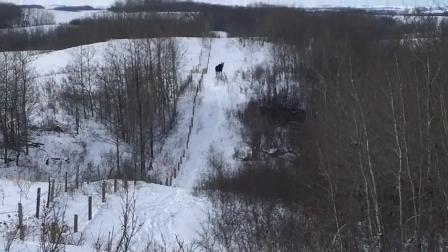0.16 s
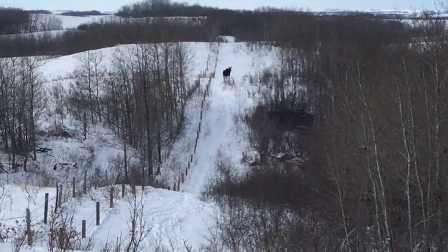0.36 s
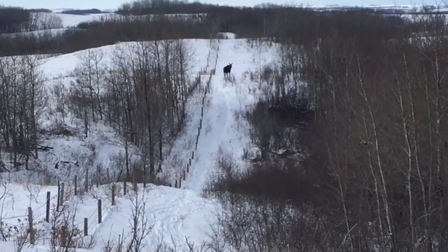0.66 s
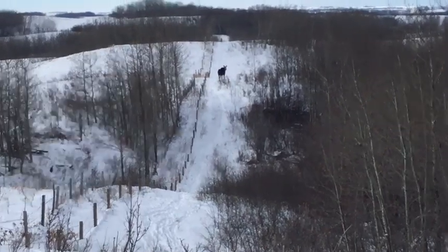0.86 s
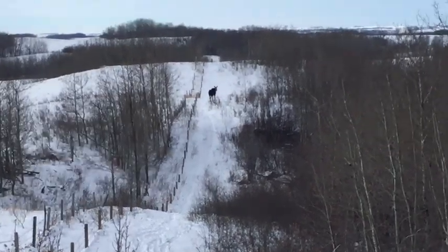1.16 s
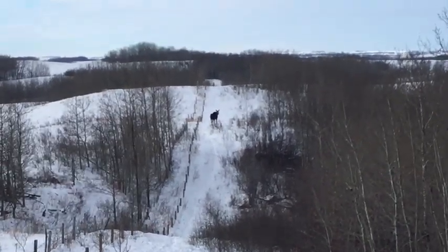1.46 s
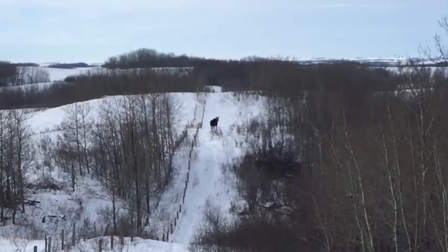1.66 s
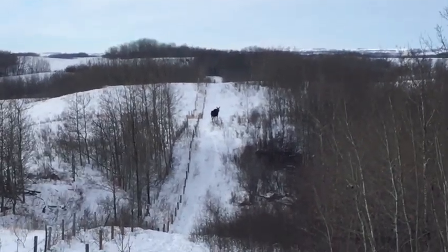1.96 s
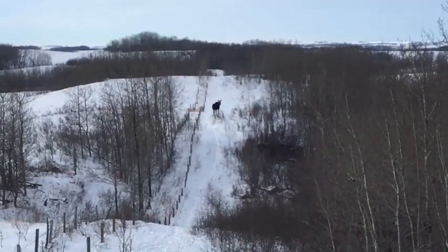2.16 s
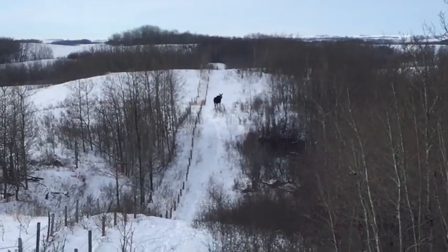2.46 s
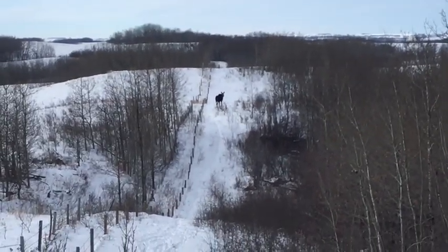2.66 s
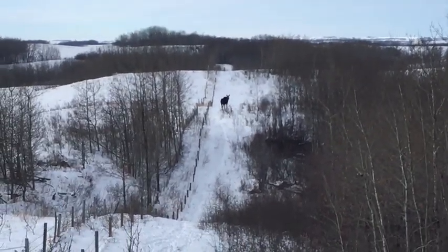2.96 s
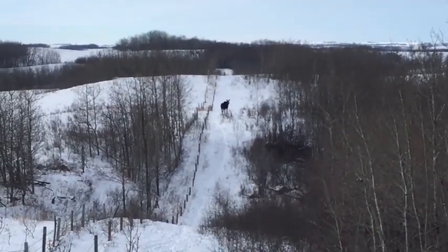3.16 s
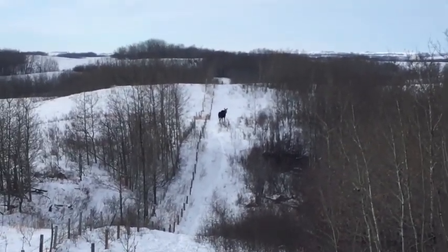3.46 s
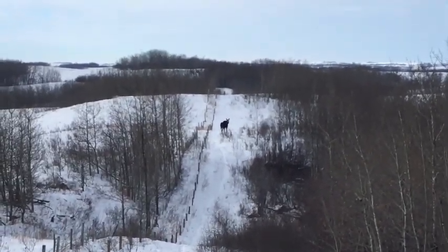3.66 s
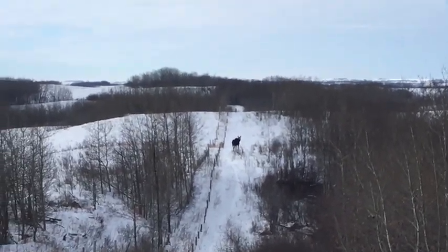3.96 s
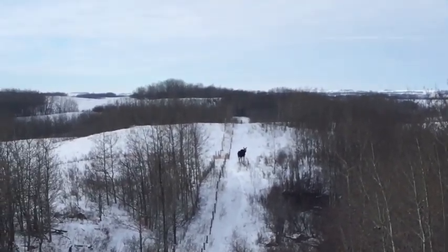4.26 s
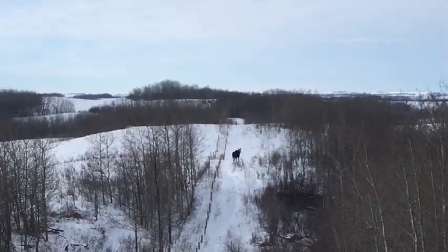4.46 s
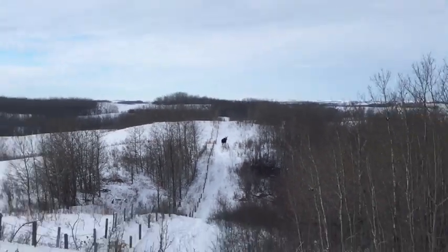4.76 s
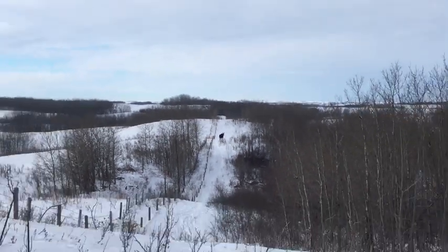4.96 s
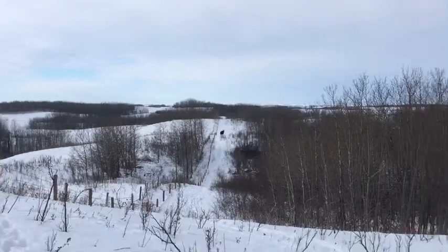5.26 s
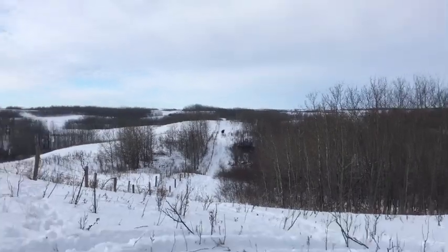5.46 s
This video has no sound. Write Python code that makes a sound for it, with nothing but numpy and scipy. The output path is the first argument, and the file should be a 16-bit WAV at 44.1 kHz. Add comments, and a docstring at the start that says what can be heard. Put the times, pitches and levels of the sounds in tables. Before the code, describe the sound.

Steady pulsing idle of a nearby snowmobile engine outdoors, with small stumbles, thumps and clacking loose steel parts.

```python
"""A two-stroke snowmobile idles close by on open snow, no echo; the crank turns about 28 times a second.
From the start: crank drone, fan whir, gas hiss, block and cowling clatter, loose clutch parts rattling.
Only every other turn burns well, so the exhaust pipe throbs at half the crank rate.
From 0.1 s on, odd burns knock and thump, steel clacks, and stumbles swap hard and missed turns.
A thin opening squeal is gone by 1.3 s; the rattle has grown by then, and the idle runs on to the end."""
import sys
import numpy as np
from scipy import signal
from scipy.fft import rfft, irfft
from scipy.io import wavfile
from scipy.ndimage import uniform_filter1d

SR = 44100
rng = np.random.default_rng(int(sys.argv[2]) if len(sys.argv) > 2 else 0)


def int16_out(signal):
    """Quantize to a 16-bit WAV file."""
    q = np.round(np.clip(np.atleast_2d(signal).T, -1, 1) * 32767)
    wavfile.write(sys.argv[1], SR, q.astype(np.int16))


N = 247389
TIME_S = np.arange(N) / SR

# Table levels are relative.
# crank speed (time [s], speed [turns/s])
CRANK_HZ = [(0.0, 28.35), (0.4, 28.39), (0.9, 28.54), (1.3, 28.28), (1.7, 27.97), (2.2, 28.11),
            (2.7, 28.35), (3.2, 28.4), (3.7, 28.09), (4.2, 28.18), (4.7, 28.28), (5.2, 28.2), (5.6, 28.49)]
# turns that half fire instead of missing (time [s], burn [-1 missed to +1 hard])
STUMBLES = [(0.11, 0.04), (0.98, 0.067), (1.23, 0.19), (1.62, 0.21), (2.79, 0.11), (3.54, 0.29),
            (3.78, -0.012), (4.25, 0.34), (4.35, 0.16), (4.74, 0.22), (4.85, 0.28), (4.95, 0.27),
            (5.56, 0.31)]
# drone partials (order [x crank speed], level [dB])
DRONE_ORDERS = [(2, -3.5), (3, 3.5), (4, -22), (5, -4.5), (7, -13.5), (8, -24.5), (9, -18.5), (11, -18),
                (12, -24.5), (15, -30), (16, -23.5), (17, -35), (18, -35), (19, -30.5), (23, -35),
                (26, -32)]
# fan and belt whir (frequency [Hz], level [dB])
WHIR_COLOUR = [(300, 1.5), (450, 0), (800, -0.5), (1100, -2.5), (1350, -2), (1550, 3), (1750, -4),
               (2350, -4.5), (2800, -16), (4000, -20)]
# gas hiss at the port (frequency [Hz], level [dB])
GAS_COLOUR = [(1500, -10), (3800, -33), (4800, -8.5), (6000, 5), (7800, -6.5), (9400, 0), (10400, -10.5),
              (11800, -5), (13500, -1.5), (15600, -11.5)]
# rattle and hiss during an even lope (time [s], level [dB])
RATTLE_DB = [(0, -55), (.85, -54), (1.3, -49.5), (1.8, -49), (2.6, -50.5), (4.5, -48.5), (5.6, -52)]
# cowling panel resonances (frequency [Hz], width [Hz], level [dB])
PANEL_MODES = [(311.8, 27, -1), (448.8, 18.6, -1), (535, 88, -13.5), (620, 36, -9), (725.3, 16.6, 0.5),
               (877.1, 15.9, 1.5), (895.6, 16.8, 1), (998, 40, 1), (1068, 33, 2), (1135, 37, 0.5),
               (1182, 38, 1.5)]
# loose steel parts (frequency [Hz], level [dB])
STEEL_COLOUR = [(1500, -24.5), (2700, 8.5), (3800, 2), (4350, -2), (4800, -3), (5250, 8), (6800, -2.5),
                (7700, 0.5), (9400, -3.5), (10400, -24), (13500, -14), (15600, -5.5)]
# steel resonances, seated loose (frequency [Hz], width [Hz], level [dB])
LOOSE_MODES = [(2930, 21, 19), (4440, 26, 16.5), (6020, 26, 17.5), (6870, 120, 12)]
# steel resonances, seated snug (frequency [Hz], width [Hz], level [dB])
SNUG_MODES = [(4240, 99, 14), (5246, 110, 17), (5540, 41, 8.2), (6130, 41, 6.5), (7250, 65, 9.2),
              (8100, 52, 5.1)]
# seating of the steel parts (time [s], seating [0 loose to 1 snug])
SEATING = [(0, 0.4), (1.1, 0.48), (1.35, 0.039), (2.1, 0.03), (2.4, 0.42), (3.4, 0.34), (5.6, 0.61)]
# sharpest steel clacks (time [s], ring level [dB], gas level [dB])
CLACKS = [(0.13, -43, -66), (0.316, -54, -54), (0.531, -52, -53), (0.662, -63, -55), (0.680, -64, -53),
          (0.879, -51, -50), (1.058, -49, -50), (1.126, -49, -50), (1.202, -58, -54), (1.233, -46.5, -59),
          (1.374, -52, -56), (1.447, -45, -46.5), (1.518, -42.5, -49), (1.734, -45, -60), (1.767, -44, -49),
          (1.837, -44, -44.5), (1.876, -43.5, -61), (1.912, -50, -50), (1.984, -58, -56), (2.195, -50, -46),
          (2.235, -45.5, -54), (2.266, -45, -50), (2.408, -47.5, -49.5), (2.478, -46, -52),
          (2.619, -47, -43.5), (2.658, -43, -60), (2.937, -41, -45), (3.018, -51, -55), (3.077, -48, -53),
          (3.219, -53, -47), (3.289, -47, -49), (3.430, -53, -51), (3.536, -51, -52), (3.861, -57, -48),
          (3.93, -42.5, -44.5), (3.999, -49, -54), (4.071, -45, -56), (4.141, -44, -46), (4.495, -45, -49),
          (4.566, -48, -48), (4.637, -44, -51), (5.031, -46, -49), (5.097, -40.5, -44), (5.176, -47, -57),
          (5.240, -52, -52), (5.380, -50, -49), (5.563, -51, -48)]
# engine block (frequency [Hz], level [dB])
BLOCK_COLOUR = [(120, -16.5), (250, 6.5), (320, 3.5), (400, 1.5), (460, 3.5), (620, 1), (720, 4.5),
                (800, -4.5), (880, 7.5), (1000, 1.5), (1180, 1), (1320, -5), (1570, -6), (1720, -15),
                (2350, -10.5), (2800, -29.5), (4000, -29), (9000, -35)]
# piston and drive slaps on the block (crank angle [turns], level [dB], gain per unit burn [dB])
SLAPS = [(.04, -5, 12), (.16, -4.5, 14), (.26, -8.5, -9), (.355, -4, 14), (.53, -4, 13), (.70, -5, 14),
         (.85, -4, 3)]
# pipe and silencer resonances (frequency [Hz], width [Hz], level [dB])
PIPE_MODES = [(44.9, 3.8, -20), (101, 15.7, -1), (168.6, 8.2, -15)]
# burns hard or late enough to knock the block (time [s], level [dB])
KNOCKS = [(0.097, -25.5), (0.211, -40), (0.319, -30), (0.449, -35.5), (0.662, -28), (0.733, -44),
          (1.528, -31), (1.775, -34), (1.826, -24), (1.919, -26), (1.99, -32), (2.265, -29), (2.618, -35),
          (2.718, -31), (2.822, -32), (2.933, -23), (3.222, -29.5), (3.816, -26.5), (3.923, -23.5),
          (4.001, -34), (4.14, -26), (4.562, -31), (4.985, -29), (5.094, -21.5), (5.376, -23)]


def undb(db):
    """Decibels to gain."""
    return 10 ** (np.asarray(db) / 20)


def level(x, rms_db):
    """Scale to an rms level."""
    return x * undb(rms_db) / np.sqrt(np.mean(x ** 2))


def curve(table, at_s):
    """Interpolate (time [s], value) rows."""
    return np.interp(at_s, *np.transpose(table))


def body(x, colour, modes=(), size=16384):
    """Ring a causal body of broad colour and narrow modes; white noise keeps its level."""
    hz = np.maximum(np.arange(size // 2 + 1) * SR / size, 1)
    points_hz, db = np.transpose(colour)
    below = np.minimum(hz / points_hz[0], 1) ** 2
    above = np.minimum(points_hz[-1] / hz, 1) ** 2
    power = (undb(np.interp(np.log(hz), np.log(points_hz), db)) * below * above) ** 2
    for centre_hz, width_hz, peak_db in modes:
        power += (undb(peak_db) / (1 + ((hz - centre_hz) / width_hz) ** 2)) ** 2
    cepstrum = irfft(np.log(power / power.mean()) / 2)
    cepstrum[1:size // 2] *= 2  # fold to minimum phase
    cepstrum[size // 2 + 1:] = 0
    return signal.fftconvolve(x, irfft(np.exp(rfft(cepstrum))))[:N]


def rings(modes, rise_s):
    """Response to one blow; neighbouring modes swing in opposite senses."""
    t = TIME_S[:SR // 5]
    ring = sum(-(-1) ** k * undb(db) * np.exp(-np.pi * width_hz * t) * np.sin(2 * np.pi * hz * t)
               for k, (hz, width_hz, db) in enumerate(modes))
    return ring * (1 - np.exp(-t / rise_s))


def pulses(times_s, sizes):
    """One impulse at each time."""
    inside = (times_s >= 0) & (times_s < (N - 1) / SR)
    return np.bincount((times_s[inside] * SR).astype(int), sizes[inside], N)


def bursts(times_s, sizes, rise_s, decay_s):
    """Envelope that rises and decays at each time."""
    t = TIME_S[:SR // 4]
    shape = (1 - np.exp(-t / rise_s)) * np.exp(-t / decay_s)
    return signal.fftconvolve(pulses(times_s, sizes), shape)[:N]


def walk(rate_hz):
    """Smooth random drift, rms 1."""
    hold = int(SR / rate_hz)
    steps = np.repeat(rng.standard_normal(N // hold + 1), hold)
    return level(uniform_filter1d(steps, hold)[:N], 0)


def grit(spread_db):
    """Dense tiny contacts of uneven size."""
    return level(rng.standard_normal(N) * undb(spread_db * walk(2500)), 0)


def firing(starts_s, lope_depth=0.33, lope_sag=0.55, settle_turns=2.0, rattle_sag_db=4.5):
    """Hard (+) and missed (-) burns alternate; a stumble swaps them and eases lope and rattle nearby."""
    stumble_s, half_burns = np.transpose(STUMBLES)
    turns = np.arange(len(starts_s))
    slips = np.abs(starts_s[:, None] - stumble_s).argmin(axis=0)
    turns_to_slip = np.abs(turns[:, None] - slips).min(axis=1)
    unsettled = np.exp(-turns_to_slip / settle_turns)
    sign = (-1.) ** (turns + np.searchsorted(slips, turns))
    burn = sign * lope_depth * (1 - lope_sag * unsettled)
    burn[slips] = half_burns
    return burn, curve(RATTLE_DB, starts_s) - rattle_sag_db * unsettled


def drone(crank_turns, lead_turns=0.04, scatter=0.0938, flutter=0.21, onset_s=0.006):
    """Pumping and shaking on every turn; low orders crest together, high ones scatter and flutter."""
    tone = 0
    for order, db in DRONE_ORDERS:
        phase = min(scatter * order, 1) ** 3 * np.pi * rng.standard_normal()
        waver = 1 + flutter * min(order / 10, 2) * walk(21.96)
        tone += undb(db) * waver * np.cos(2 * np.pi * order * (crank_turns + lead_turns) + phase)
    return level(tone, -18.5) * np.minimum(TIME_S / onset_s, 1)


def fan(squeal_hz=1880, squeal_db=-58, squeal_end_s=1.3):
    """Fan and belt whir evenly; at first a thin squeal rides on them."""
    pitch_hz = squeal_hz + 10 * walk(60)
    fade = np.clip((squeal_end_s - TIME_S) / .1, 0, 1)
    squeal = np.sin(2 * np.pi * np.cumsum(pitch_hz) / SR) * fade
    whir = body(rng.standard_normal(N), WHIR_COLOUR)
    return level(whir, -44.5) + undb(squeal_db) * squeal


def hiss(when, burn, rattle_db, kick_db=10, scatter_db=2):
    """Hard burns spit gas past the piston, then at the port, over a leak; all follow the rattle level."""
    force = undb(kick_db * burn + rattle_db + scatter_db * rng.standard_normal(len(burn)))
    spit = bursts(when(.025), force, rise_s=.0015, decay_s=.011)
    port = bursts(when(.29), force * undb(2), rise_s=.002, decay_s=.018)
    leak = undb(0.5 * curve(RATTLE_DB, TIME_S))
    flow = level(spit + port, -61) + level(leak, -65.5)
    return body(flow * grit(spread_db=1), GAS_COLOUR)


def cowling(when, burn, strike_turns=0.029, kick_db=11, scatter_db=1.5, jitter_s=0.00021):
    """A piston blow each turn, and each knock, rings the panels at their own pitches."""
    timing, strength = rng.standard_normal((len(burn), 2)).T
    blows = pulses(when(strike_turns) + jitter_s * timing, undb(kick_db * burn + scatter_db * strength))
    knock_s, knock_db = np.transpose(KNOCKS)
    blows += pulses(knock_s, undb(knock_db + 29))
    return level(signal.fftconvolve(blows, rings(PANEL_MODES, rise_s=.019))[:N], -37.5)


def clutch(when, burn, rattle_db, scatter_db=2, clack_scatter_db=3.5, jitter_s=0.0003):
    """Steel parts cross their play each turn and bounce; hard burns bring contact sooner and clack."""
    timing, hit_luck, bounce_luck, kick_luck = rng.standard_normal((len(burn), 4)).T
    contact_s = when(.125 - .05 * burn) + jitter_s * timing
    hit_force = undb(rattle_db + scatter_db * hit_luck + 0.5)
    bounce_force = undb(rattle_db + scatter_db * bounce_luck - 6)
    kick_force = np.maximum(burn, 0) * undb(rattle_db + 2 + clack_scatter_db * kick_luck)
    hit = bursts(contact_s, hit_force, rise_s=.001, decay_s=.0073)
    bounce = bursts(contact_s + .0053, bounce_force, rise_s=.001, decay_s=.018)
    soft_clack = bursts(when(.034), kick_force, rise_s=.003, decay_s=.013)
    clack_s, ring_db, gas_db = np.transpose(CLACKS)
    sharp_clack = bursts(clack_s, undb(ring_db), rise_s=.001, decay_s=.012)
    shake = np.hypot(hit + bounce, np.maximum(soft_clack, sharp_clack)) * grit(spread_db=1.5)
    seating = np.clip(curve(SEATING, TIME_S) * (1 + .5 * walk(28)), 0, 1)
    loose = body(shake * np.sqrt(1 - seating), STEEL_COLOUR, LOOSE_MODES)
    snug = body(shake * np.sqrt(seating), STEEL_COLOUR, SNUG_MODES)
    # gas spat with each clack
    crack = bursts(clack_s, undb(gas_db + 9), rise_s=.0005, decay_s=.0022)
    tail = bursts(clack_s + .007, undb(gas_db - 1), rise_s=.002, decay_s=.012)
    spit = np.maximum(undb(6) * soft_clack, np.hypot(crack, tail))
    return loose + snug + body(spit * grit(spread_db=3), GAS_COLOUR)


def block(when, burn, ignition_turns=0.0405, kick_db=10, scatter_db=2.5, jitter_s=0.00026):
    """Each turn sends one shudder and rough slaps through the block, scaled by burn; knocks add in."""
    timing, strength, *slap_luck = rng.standard_normal((len(burn), 2 + len(SLAPS))).T
    ignition_s = when(ignition_turns) + jitter_s * timing
    force = undb(kick_db * burn + scatter_db * strength)
    t = TIME_S[:SR // 8]
    swell = (1 - np.exp(-t / .003)) * np.exp(-t / .018)
    shudder = signal.fftconvolve(pulses(ignition_s, force), rng.standard_normal(len(t)) * swell)[:N]
    slaps = 0
    for (angle_turns, db, swing_db), luck in zip(SLAPS, slap_luck):
        slap_force = undb(db + swing_db * burn + scatter_db * luck)
        slaps += bursts(when(angle_turns), slap_force, rise_s=.00072, decay_s=.0046)
    knock_s, knock_db = np.transpose(KNOCKS)
    knocks = bursts(knock_s, undb(knock_db - 2.5), rise_s=.006, decay_s=.02)
    clatter = np.hypot(level(slaps, -35.5), knocks) * grit(spread_db=0.5)
    return body(level(shudder, -44.5) + clatter, BLOCK_COLOUR)


def exhaust(when, burn, port_turns=0.4737, unevenness=0.056, jitter_s=0.00034):
    """The port opens near mid-turn; gas above or below the average puff rings the pipe."""
    timing, strength = rng.standard_normal((len(burn), 2)).T
    puffs = pulses(when(port_turns) + jitter_s * timing, burn + unevenness * strength)
    return level(signal.fftconvolve(puffs, rings(PIPE_MODES, rise_s=.0011))[:N], -16.5)


def thumps(ring_hz=128, decay_s=0.0089, gain_db=13):
    """Each knock shoves a short, deep thump out of the silencer."""
    knock_s, knock_db = np.transpose(KNOCKS)
    t = TIME_S[:SR // 8]
    thump = np.sin(2 * np.pi * ring_hz * t) * np.exp(-t / decay_s)
    return signal.fftconvolve(pulses(knock_s, undb(knock_db + gain_db)), thump)[:N]


def scene():
    """Sum all parts, mono; one crank times the firing."""
    crank_turns = np.cumsum(curve(CRANK_HZ, TIME_S)) / SR
    turns = np.arange(int(crank_turns[-1]) + 1)

    def when(angle_turns):
        """Time [s] at which each turn passes an angle."""
        return np.interp(turns + angle_turns, crank_turns, TIME_S)

    burn, rattle_db = firing(when(0))
    throb = drone(crank_turns) + exhaust(when, burn) + thumps()
    clatter = block(when, burn) + cowling(when, burn)
    return (throb + clatter + fan() + hiss(when, burn, rattle_db) + clutch(when, burn, rattle_db))[None]


def record(dry):
    """Thin the bass below 34 Hz; cut the top above 15.6 kHz."""
    highpass = signal.butter(3, 34, "highpass", fs=SR, output="sos")
    lowpass = signal.ellip(10, .2, 80, 15600, fs=SR, output="sos")
    return signal.sosfilt(lowpass, signal.sosfiltfilt(highpass, dry))


dry = scene()
out = record(dry)
int16_out(out)
```